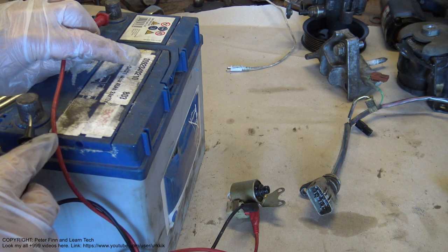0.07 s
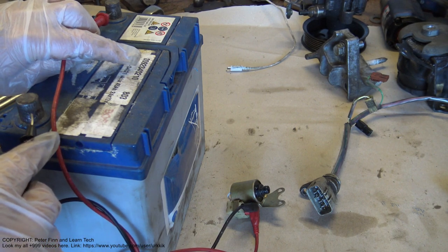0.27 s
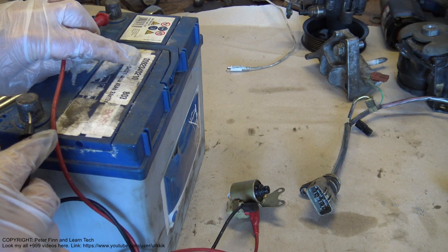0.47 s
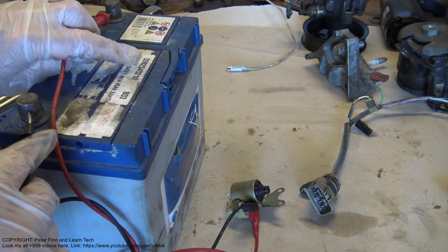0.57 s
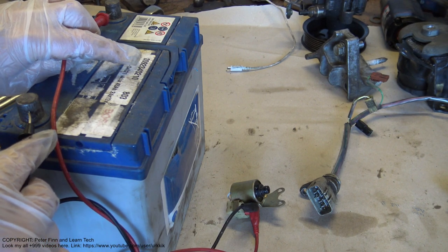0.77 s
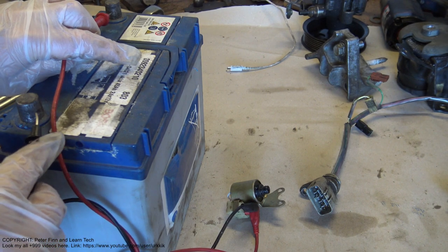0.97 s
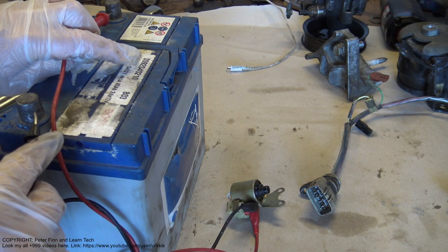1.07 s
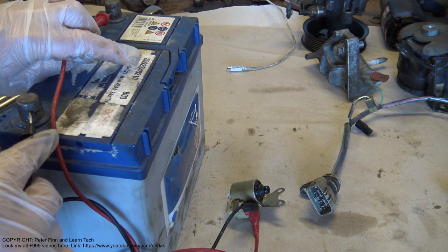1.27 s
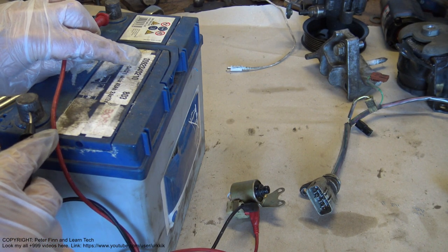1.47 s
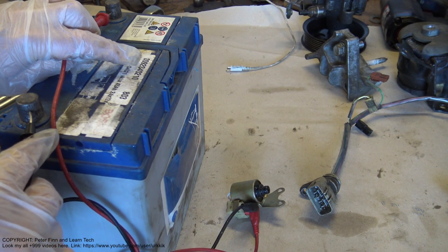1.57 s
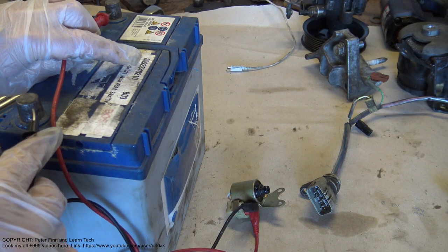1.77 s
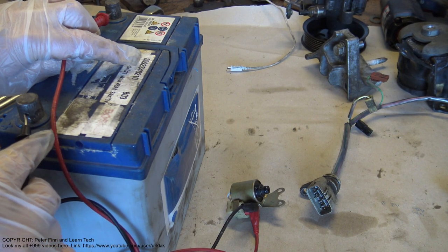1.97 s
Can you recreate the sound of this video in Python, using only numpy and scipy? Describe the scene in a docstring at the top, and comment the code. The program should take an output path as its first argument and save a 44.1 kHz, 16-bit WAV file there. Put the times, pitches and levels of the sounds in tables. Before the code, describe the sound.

A small electric solenoid on a workbench snaps on, drops off, and repeats, five bright metallic clicks in all, close to the microphone, with a short room tail and a steady low roar beneath.

```python
"""Valve solenoid on a workbench

A small solenoid pulls three times and drops twice: its plunger snaps against the pole, then falls back on
its seat. Strokes are damped sines (snap, steel shell) and shaped noise (rattle of small parts); the workshop
answers with a noise tail that dies at its own speed in each band. A broad outdoor roar of filtered noise,
a hum of wavering sines and microphone hiss run throughout."""
import sys
import numpy as np
from scipy import signal
from scipy.fft import rfft, irfft, next_fast_len
from scipy.io import wavfile
from scipy.ndimage import map_coordinates

SR = 44100
rng = np.random.default_rng(int(sys.argv[2]) if len(sys.argv) > 2 else 0)


def natural_amplitude(level_db):
    """Convert a level in decibels to a linear amplitude factor, elementwise."""
    exponent = np.asarray(level_db, float) / 20
    return 10 ** exponent


def wrap_up_sound(samples):
    """Save the sound to the file named by the first command line argument, as 16-bit audio."""
    columns = np.atleast_2d(samples).T
    # keep every value between -1 and 1, then stretch to whole-number steps
    tamed = np.clip(columns, -1, 1)
    steps = np.round(tamed * 32767).astype(np.int16)
    wavfile.write(sys.argv[1], SR, steps)


N = 89346


def unit(x):
    """Scaled to rms 1."""
    return x / np.sqrt(np.mean(x ** 2) + 1e-20)


def along(points, hz):
    """Interpolates (frequency [Hz], value) points on a log frequency axis."""
    f, v = np.transpose(points)
    return np.interp(np.log(hz + 1), np.log(f + 1), v)


def sides(left_minus_right_db):
    """Left and right gain for a level difference."""
    return natural_amplitude(np.array([left_minus_right_db / 2, -left_minus_right_db / 2]))


def filtered(x, response):
    """x filtered by a zero-phase response of frequency."""
    n = x.shape[-1]
    size = next_fast_len(n + 8192)
    spectrum = rfft(x, size) * response(np.fft.rfftfreq(size, 1 / SR))
    return irfft(spectrum, size)[..., :n]


def wobble(knots_per_s):
    """Smooth random curve through normal-distributed knots."""
    knots = rng.standard_normal(int(N * knots_per_s / SR) + 4)
    return map_coordinates(knots, [np.arange(N) * knots_per_s / SR])


def roar():
    """Broad outdoor noise, swelling slightly; mid/side balance sets the left-right correlation per band."""
    # roar spectrum: (frequency [Hz], density [dB per Hz, relative])
    roar_density = [(15, -27.5), (26, -5), (50, -10), (80, -13.5), (115, -8), (146, -5.5), (200, -4.5),
                    (250, -12.5), (300, -6.5), (400, -12), (500, -9), (700, -6.5), (980, -3), (1300, -7.5),
                    (1700, -16), (3000, -28), (6000, -43.5), (9000, -120)]
    # stereo likeness: (frequency [Hz], left-right correlation [-1..1])
    likeness = [(60, 0.3), (300, 0.74), (1400, 0.69), (3100, 0.44)]
    level_db, swell_db = -42.5, 0.2

    def mid_side_response(hz):
        angle = np.arccos(np.clip(along(likeness, hz), -1, 1)) / 2
        return natural_amplitude(along(roar_density, hz)) * [np.cos(angle), np.sin(angle)]

    mid, side = filtered(rng.standard_normal((2, N)), mid_side_response)
    stereo = unit(np.array([mid + side, mid - side]))
    return natural_amplitude(level_db + swell_db * wobble(2.8)) * stereo


def hum():
    """Low sine drones whose pitch and level wander at random."""
    # drones: (frequency [Hz], peak level [dB], pitch wander [Hz], level wander [dB])
    drones = [(40.4, -54, 4, 2.5), (122.4, -62, 6.6, 2.5), (167.2, -67, 4.3, 7.5), (285.2, -61, 5, -1)]
    total = np.zeros(N)
    for hz, db, wander_hz, wander_db in drones:
        level = natural_amplitude(db + wander_db * wobble(9.3))
        phase = 2 * np.pi * np.cumsum(hz + wander_hz * wobble(9)) / SR
        total += level * np.sin(phase)
    return total


def background():
    """Roar and hum, both slightly stronger on the right."""
    left_minus_right_db = -2
    return sides(left_minus_right_db)[:, None] * (roar() + hum())


def microphone_hiss():
    """Independent shaped noise at each microphone."""
    # hiss spectrum: (frequency [Hz], density [dB per Hz, relative])
    hiss_density = [(1760, -6), (3000, -6.5), (4500, 0), (9000, 0), (15600, -3.5), (15800, -42)]
    level_db = -62
    noise = rng.standard_normal((2, N))
    return natural_amplitude(level_db) * unit(filtered(noise, lambda hz: natural_amplitude(along(hiss_density, hz))))


def ringing(modes, kind, t, longer=1):
    """Struck modes as damped sines with scattered levels (kind 0 pull, 1 drop); the right hears them later."""
    scatter_db, right_lag_s, rise_s = 2.64, .00002, .00022
    ear_t = t - np.array([[0], [right_lag_s]])
    total = np.zeros((2, len(t)))
    for hz, pull_db, drop_db, t60_s, left_minus_right_db in modes:
        start_db = (pull_db, drop_db)[kind] + scatter_db * rng.normal()
        decay = natural_amplitude(start_db - 60 * t / (t60_s * longer))
        total += sides(left_minus_right_db)[:, None] * decay * np.sin(2 * np.pi * hz * ear_t)
    return total * (1 - np.exp(-t / rise_s))


def small_parts_rattle(kind, t):
    """Dense rattle of bracket and spring: decaying shaped noise, partly shared by the two sides."""
    # one list for a pull, one for a drop: (frequency [Hz], density [dB per Hz, relative])
    rattle_density = [(1940, -60), (3300, -27.5), (4560, 2.5), (5420, -40), (6220, 5.5), (7740, -3),
                      (9370, 3), (12000, -7), (16000, -4)], [(1530, -31.5), (2600, -14), (3580, -14.5),
                      (4490, -9), (5780, -17), (7310, -10), (9840, -5.5), (11500, -3.5), (16000, -19.5)]
    level_db, t60_s, left_minus_right_db = -14.5, 0.082, -10
    a, b = rng.standard_normal((2, len(t)))
    noise = np.array([a + .45 * b, a - 0.15 * b])
    rattle = unit(filtered(noise, lambda hz: natural_amplitude(along(rattle_density[kind], hz))))
    return natural_amplitude(level_db - 60 * t / t60_s) * sides(left_minus_right_db)[:, None] * rattle


def settling(kind, t):
    """Gain of the shell as the plunger comes to rest and damps it."""
    start_s, change_db, takes_s = (.0082, .0095)[kind], (-10, -3)[kind], .0008
    return natural_amplitude(change_db * np.clip((t - start_s) / takes_s, 0, 1))


def solenoid():
    """Plunger strokes: snap, shell, rattle, soft rebound; faint lift-off ahead of a pull. Gives (shell, rest)."""
    # plunger hits the pole: (time [s], strength [dB])
    pulls = [(.50255, -5.2), (1.27300, -4.5), (2.01455, -4.7)]
    # plunger falls back on its seat: (time [s], strength [dB])
    drops = [(.90500, -4.2), (1.64925, -4.6)]
    # steel shell mode frequencies [Hz]
    shell_hz = [370, 2240, 2325, 2872, 2960, 4545, 4660, 6385, 6950, 7420, 7625, 8080, 9340, 10360, 10480,
                11635, 13400, 15050, 15300]
    # same modes: (mean pull level [dB], mean drop level [dB], t60 before settling [s], left minus right [dB])
    shell_rows = [(-53, -31, 0.098, 0.5), (-46, -26.5, 0.045, 0), (-31, -20, 0.068, 0),
                  (-12.5, -42, 0.092, 2), (-30, -41.5, 0.04, 1.5), (-28.5, -22, 0.083, 5.5),
                  (-26, -34, 0.065, -13), (-26, -22, 0.034, -13), (-32.5, -28, 0.039, 13),
                  (-21, -15, 0.041, 4), (-12.5, -20, 0.053, -8.5), (-25, -28.5, 0.055, -18),
                  (-50, -19, .05, 0), (-30, -25.5, 0.051, -2.5), (-39.5, -26, 0.14, -2),
                  (-17, -12, 0.083, 3), (-18.5, -29, 0.013, 14), (-26, -26, 0.036, -1), (-26, -29, .04, -1)]
    # the blow: (frequency [Hz], mean pull level [dB], mean drop level [dB], pull t60 [s], left minus right [dB])
    snap_modes = [(3000, -11, -28, .004, 0), (7600, 4.5, -1.5, .0033, -4), (10400, -8, -3.5, .0038, -4),
                  (15200, -10, -11, .004, -6)]
    snap_longer = (1, 2.4)  # t60 factor on a pull, on a drop
    rebound_s, rebound_db = (.004, .0045), (-9, -26)  # on a pull, on a drop
    lift_lead_s, lift_db, lift_t60_s = .0077, -33.5, .02  # the t60 adds to the modes' own decay

    t = np.arange(SR // 5) / SR
    shell_out, rest_out = np.zeros((2, 2, N + SR))
    shell_modes = [(hz, *row) for hz, row in zip(shell_hz, shell_rows)]

    def place(out, at_s, db, sound):
        start = round(at_s * SR)
        out[:, start:start + len(t)] += natural_amplitude(db) * sound

    for kind, strokes in enumerate((pulls, drops)):
        rattle = small_parts_rattle(kind, t)  # same noise on every stroke of a kind
        damping = settling(kind, t)
        for s, db in strokes:
            snap = ringing(snap_modes, kind, t, snap_longer[kind])
            shell = ringing(shell_modes, kind, t)
            if kind == 0:
                lift_off = (.4 * snap + 3 * shell) * natural_amplitude(-60 * t / lift_t60_s)
                place(shell_out, s - lift_lead_s, db + lift_db, lift_off)
            place(shell_out, s, db, damping * shell)
            place(rest_out, s, db, snap + rattle)
            place(rest_out, s + rebound_s[kind], db + rebound_db[kind], snap)
    return shell_out[:, :N], rest_out[:, :N]


def workshop(x):
    """Room answer: a noise tail per microphone, each frequency dying at its own speed."""
    # decay: (frequency [Hz], t60 [s])
    room_t60 = [(1500, 1), (3000, 0.5), (4500, 0.46), (8000, 0.31), (15600, 0.26), (15800, 0.016)]
    # balance: (frequency [Hz], left minus right [dB])
    room_pan = [(2500, -2), (5000, -1), (8000, -3), (15000, -8.5)]
    level_db, delay_s = -5.5, 0.0042
    hz, t, bands = signal.stft(rng.standard_normal((2, SR // 2)), SR, nperseg=256)
    decay = natural_amplitude(-60 * t / along(room_t60, hz)[:, None])
    tail = signal.istft(bands * decay, SR, nperseg=256)[1]
    tail = filtered(tail / np.linalg.norm(tail[0]), lambda f: sides(along(room_pan, f)))
    late = np.pad(x.mean(axis=0), (round(delay_s * SR), 0))
    return natural_amplitude(level_db) * signal.fftconvolve(late[None], tail, axes=1)[:, :N]


def scene():
    """Background, solenoid and room."""
    shell_to_room_db = -7  # the shell's tones reach the room less than snap and rattle
    shell, rest = solenoid()
    room = workshop(rest + natural_amplitude(shell_to_room_db) * shell)
    return background() + shell + rest + room


def top_cut(x):
    """Nothing passes above the cut-off."""
    return signal.sosfilt(signal.butter(12, 16820, fs=SR, output="sos"), x)


def record(dry):
    """Microphones add hiss, the converter clips at full scale, the top band is cut."""
    # recorder's band limit: (frequency [Hz], gain [dB])
    band_limit = [(15600, 0), (15800, -15), (16500, -16), (16750, -90)]
    clipped = np.clip(dry + microphone_hiss(), -1, 1)
    mix = filtered(clipped, lambda hz: natural_amplitude(along(band_limit, hz)))
    return top_cut(mix)


dry = scene()
out = record(dry)
wrap_up_sound(out)
```